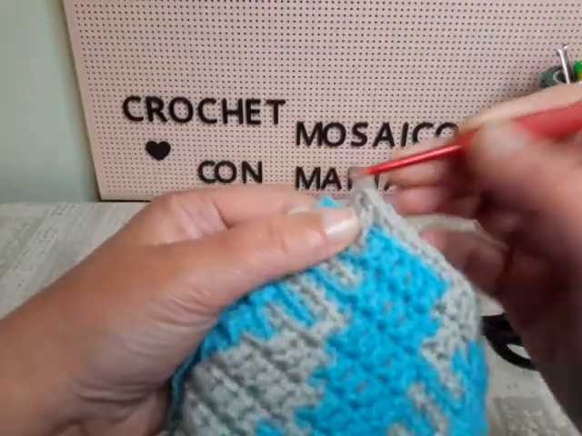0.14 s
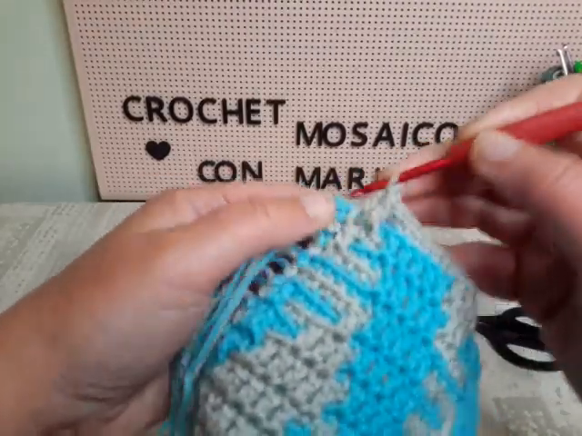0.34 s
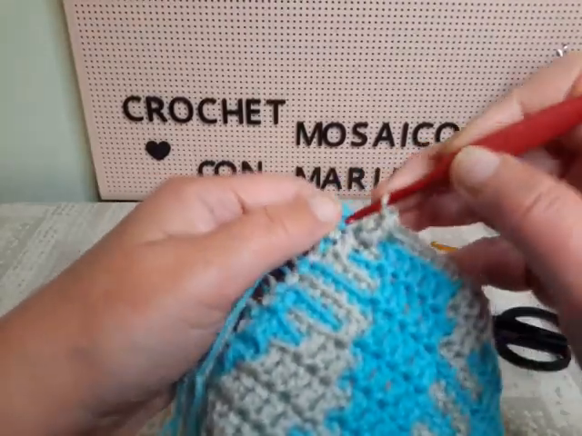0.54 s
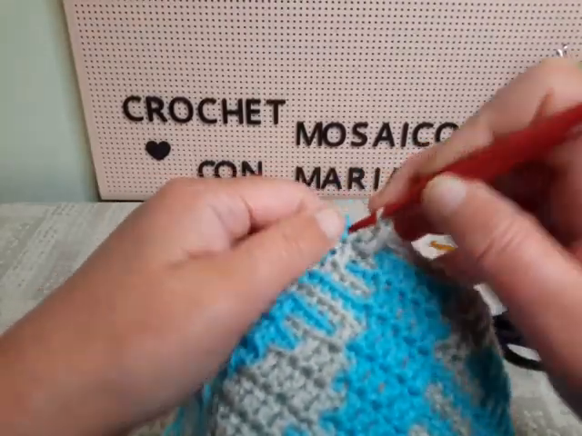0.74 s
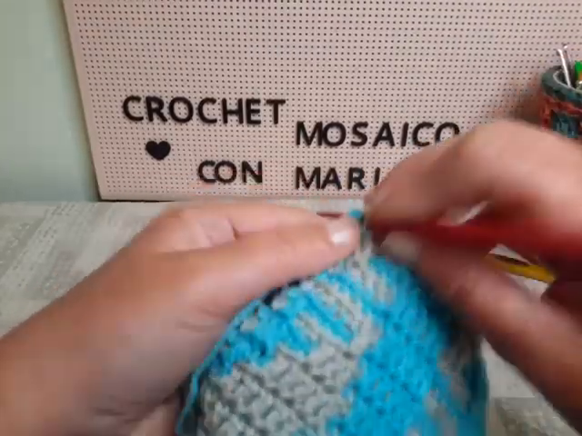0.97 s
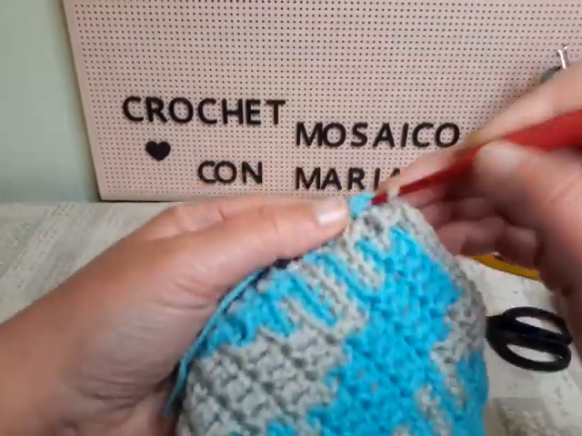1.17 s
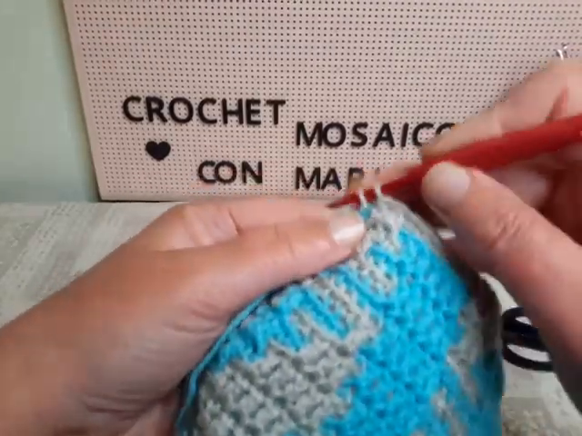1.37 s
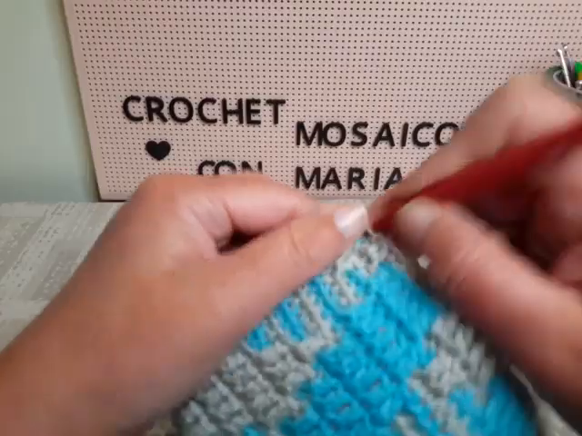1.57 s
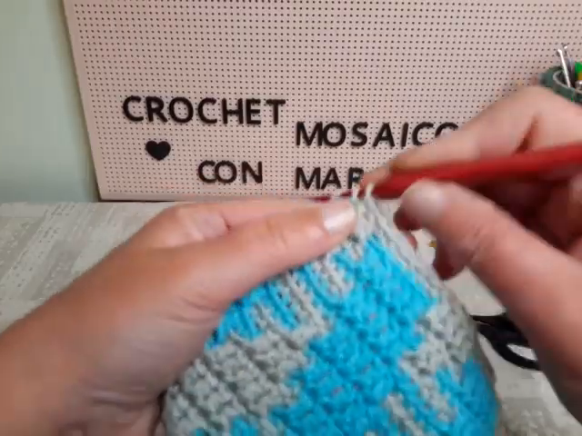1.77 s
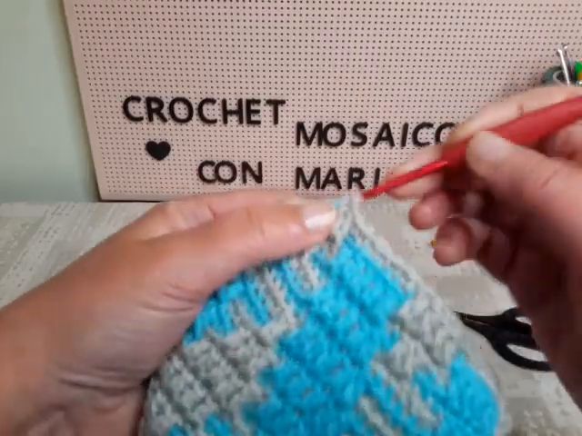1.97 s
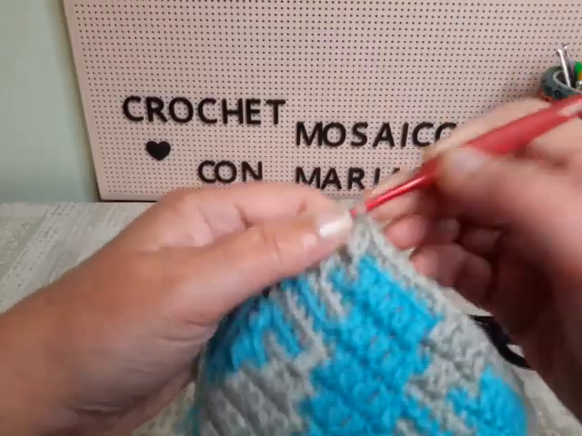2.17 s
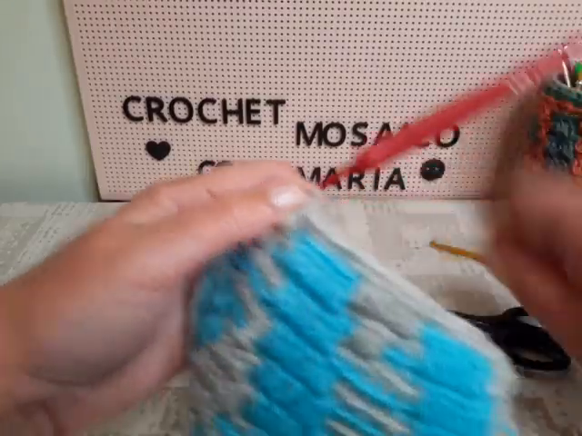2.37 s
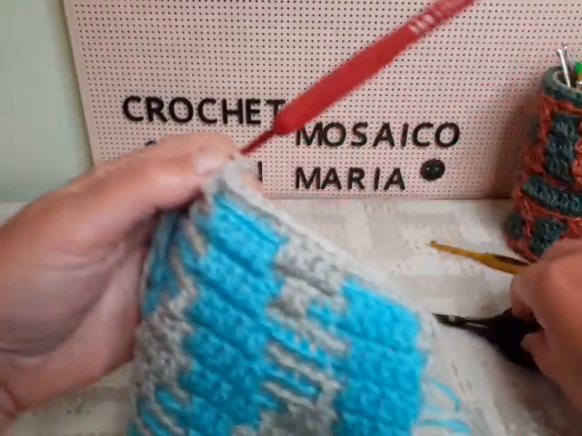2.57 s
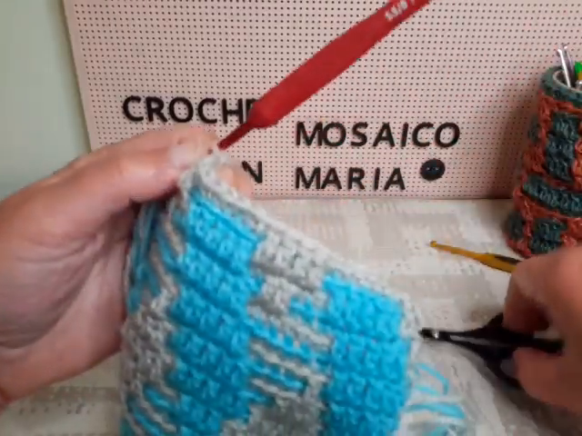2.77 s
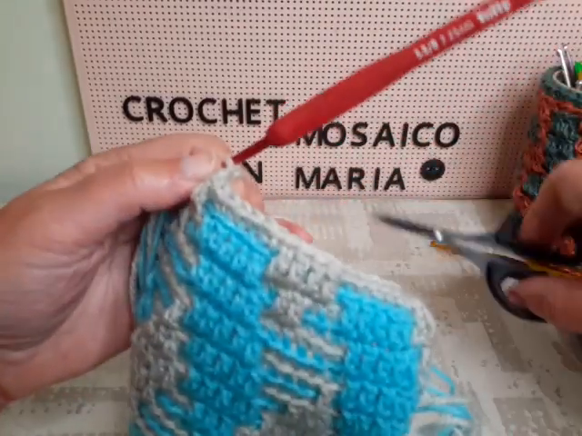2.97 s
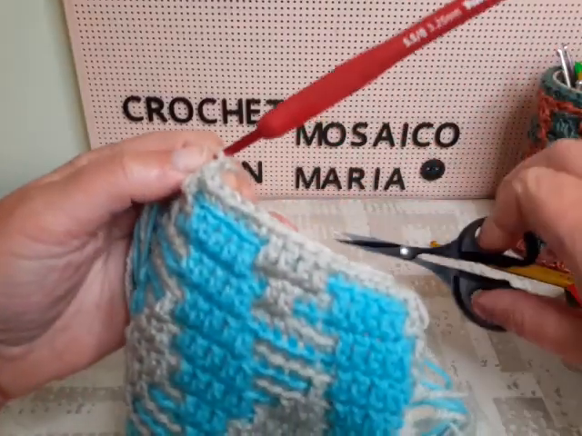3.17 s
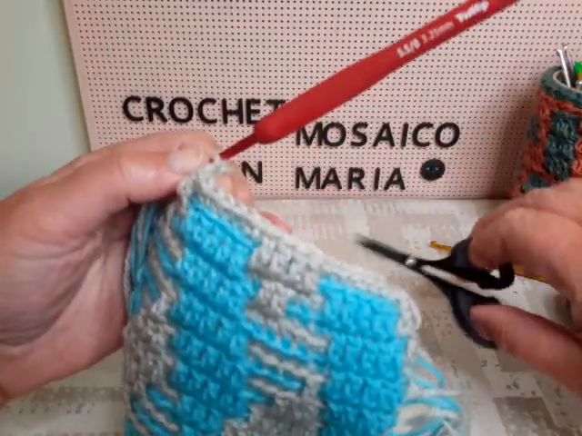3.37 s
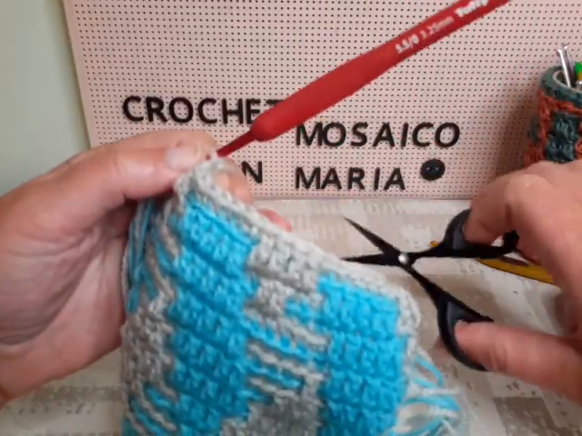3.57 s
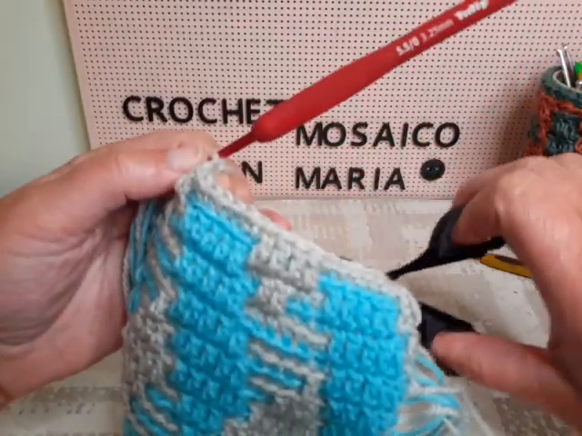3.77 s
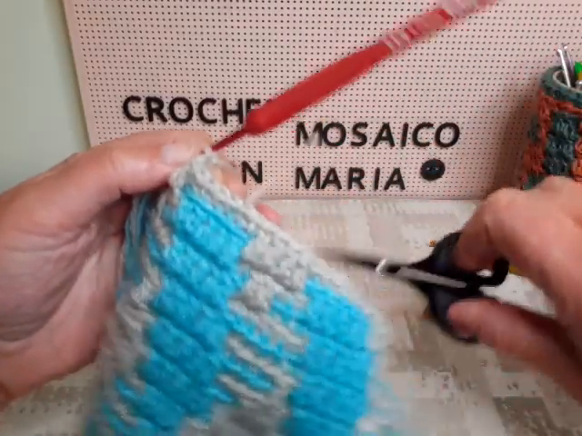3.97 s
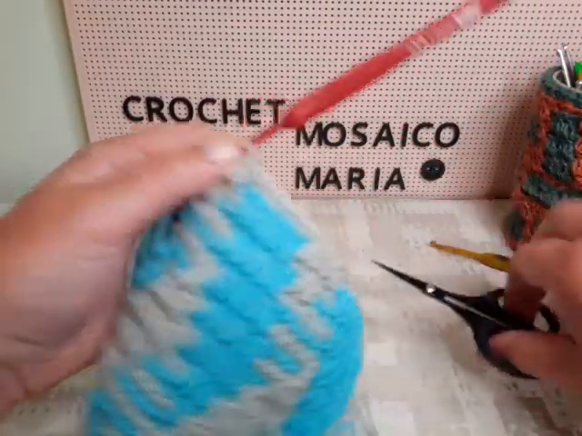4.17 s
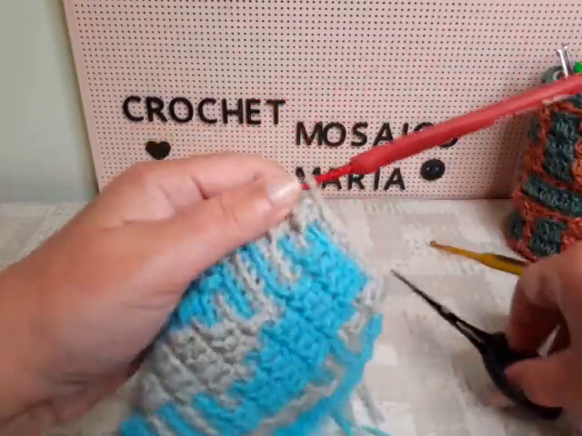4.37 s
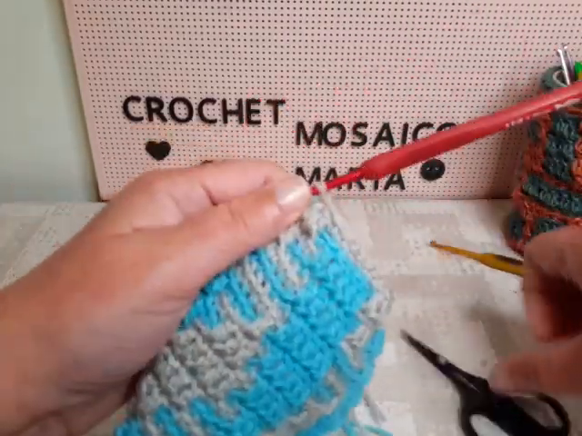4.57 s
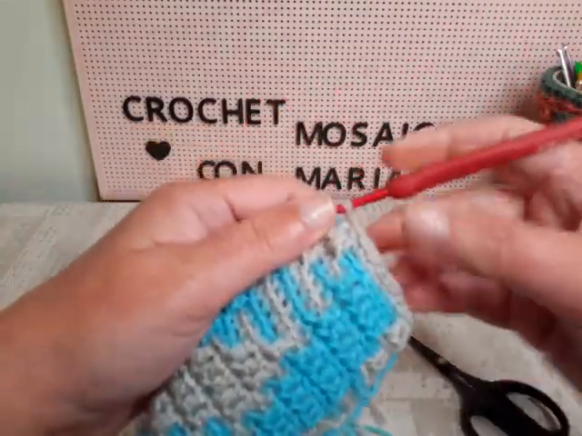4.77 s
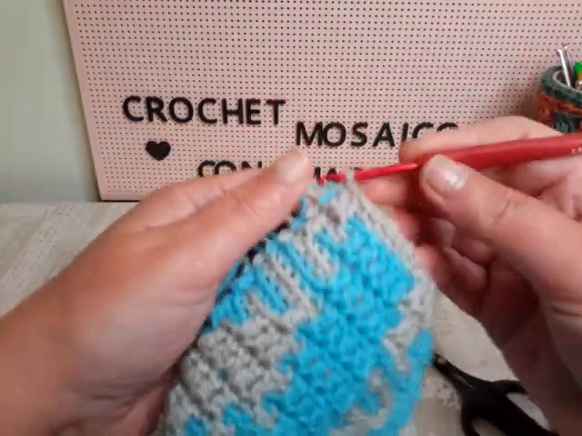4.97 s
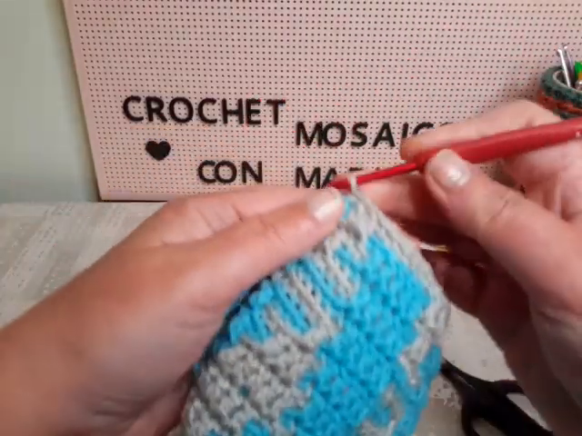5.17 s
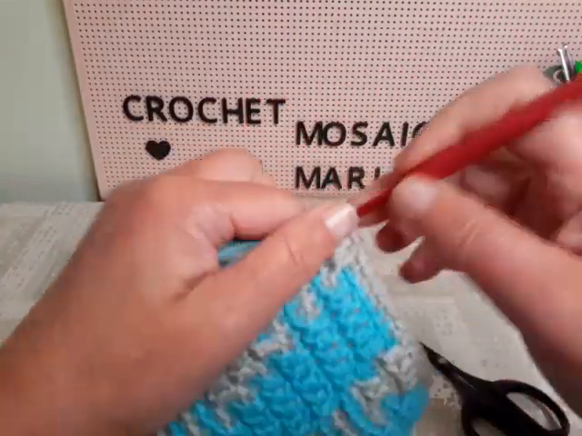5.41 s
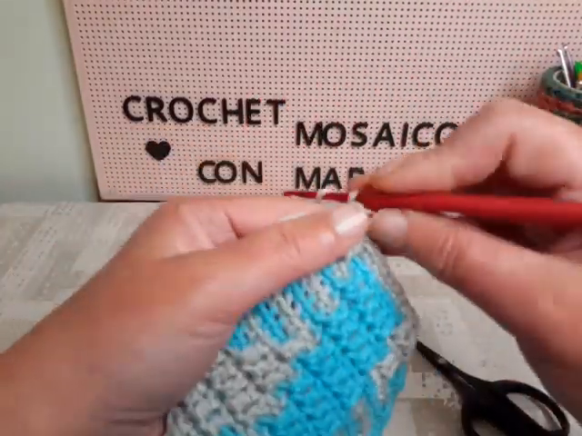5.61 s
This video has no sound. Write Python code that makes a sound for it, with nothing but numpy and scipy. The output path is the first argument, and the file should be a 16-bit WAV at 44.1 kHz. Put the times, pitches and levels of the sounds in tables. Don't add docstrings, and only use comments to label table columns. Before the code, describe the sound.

A small, quiet room with a low, soft hush and very faint hand rustle, heard from close by. From 0 to about 2.1 s hands crochet: yarn sticks and slips on the hook in tiny, short, mid-pitched squeaks, near 0, 0.35, 0.9 to 1.4, 1.6 and 2.1 s, barely above the room. At 2.6 s scissors are picked up: a quick cluster of plastic knocks with a dull wooden thud, then a light scrape and small bumps over cloth until 2.9 s. A barely audible tap follows at 3.0 s. Near 4.05 s the blades shear one strand with a brief crisp rasp, clicking shut at 4.08 s. At 4.7 s the scissors drop back, the loudest event: a dense hard clatter of plastic, steel ticks and hollow table boom, rocking rapidly and settling by about 4.85 s with a short diffuse tail. Soft rustle swells slightly around 5.1 s, then hush.

```python
import sys
import numpy as np
from scipy import signal
from scipy.io import wavfile

SR = 44100
rng = np.random.default_rng(int(sys.argv[2]) if len(sys.argv) > 2 else 0)


def to_wav(sig):
    pcm = np.clip(np.atleast_2d(sig), -1, 1) * 32767
    pcm = np.round(pcm).astype(np.int16)
    wavfile.write(sys.argv[1], SR, pcm.T)


def attenuation_scalar(level_db):
    decades = np.asarray(level_db, float) / 20
    return 10 ** decades


N = 248749

# (frequency [Hz], level [dB per Hz])
AIR_SPECTRUM = [(20, -37), (32, -14), (130, -1.5), (354, -6), (887, -14), (3340, -26), (6560, -34.5),
                (16000, -36)]
AIR_DB = -66
# (time [s], rustle [dB])
HAND_RUSTLE = [(0, 2), (.75, 1.5), (1.3, 5), (2.45, 2.5), (2.6, 7), (3.1, 4.5), (3.6, .5), (4.9, 3),
               (5.1, 7), (5.349, 2)]
# (frequency [Hz], level [dB]; the played rms is 7 dB above this value)
WHINE_TONES = [(10864, -104)]
# (frequency [Hz], t60 [s])
ROOM_DECAY = [(100, 0.27), (500, 0.54), (2000, 0.37), (5000, 0.33), (12000, 0.31)]
# (frequency [Hz], level [dB])
ROOM_TINT = [(100, 1), (300, -0.5), (600, -7), (1200, -4.5), (2200, 2), (5000, 3.5), (12000, 7.5)]
ROOM_DB, ROOM_BUILD_S = -6, 0.0064
EDGES_HZ = 25 * 2 ** np.arange(0, 9.5, .4)

# (peak time [s], rub level [dB], build-up [s], favoured pitch [Hz])
YARN_STROKES = [(.008, -67, 0.04, 1400), (.338, -62.5, 0.037, 1200), (.86, -75, 0.31, 1190),
                (.93, -72, 0.066, 1300), (1.0, -66.5, 0.15, 890), (1.082, -65.5, 0.078, 950),
                (1.16, -72, 0.11, 1200), (1.32, -65.5, .04, 1700), (1.361, -62, 0.036, 1190),
                (1.614, -72, .1, 2000), (2.09, -61, 0.041, 1400)]
# (frequency [Hz], width [Hz], level [dB])
FIBRE_MODES = [(833, 25, -8), (986, 12, -7), (1150, 70, -13.5), (1373, 34, -8.5), (2350, 19, -8.5),
               (3200, 76, -15), (4400, 34, -55)]
YARN_RELEASE_S, FOCUS_DB_PER_OCTAVE = 0.042, 8
STROKE_DEPTH_DB = 20

BOOM_HZ, BOOM_T60_S = 118, .25
TWIN_HZ = 527, 547
# (frequency [Hz], level [dB], t60 [s])
TABLE_MODES = [(BOOM_HZ, -17, BOOM_T60_S), (215.6, -13, 0.19), (267, -10.5, 0.18), (260, -11.5, 0.046),
               (378, -6, 0.094), (413, -13, .06), (468, -9.5, 0.061), (TWIN_HZ[0], 2.7, 0.12), (TWIN_HZ[1],
               2.4, 0.13), (620, -14.5, 0.042), (676, -11, 0.16), (799, -4.5, 0.12), (880, -8, .05)]
# (frequency [Hz], level [dB], t60 [s])
HANDLE_MODES = [(897, -2.5, 0.01), (1180, -7, 0.0094), (1448, -3, 0.02), (1920, -5.5, 0.0064),
                (1930, -5, 0.012), (2470, 3.5, 0.0029), (2940, -8.5, 0.0096), (3430, -8.5, 0.007)]
# (frequency [Hz], level [dB], t60 [s])
BLADE_MODES = [(3530, -6.5, 0.0071), (4230, 2.5, 0.0036), (4416, 2, 0.0056), (4890, 3.5, .004),
               (5300, -2, 0.0062), (6760, 1, 0.0047), (7700, -6, 0.009), (9400, -10.5, 0.0024),
               (11600, -12.5, .003), (13000, -18, .003), (14900, -13, .003)]

# (peak time [s], level [dB], build-up [s])
SHEAR_STROKES = [(4.052, -56, 0.028)]
SHEAR_RELEASE_S = 0.053
# (time [s], click [dB], thump [dB])
SHUT_TAPS = [
    (3.0072, -80, -47),
    (4.057, -69, -51),
    (4.0819, -42, -42.5),
]
# (time [s], level [dB])
BLADE_REBOUND = [(4.0910, -55)]

# (time [s], pressure as level [dB])
DRAG_PRESSURE = [(2.66, -43.5), (2.69, -52.5), (2.72, -59.5), (2.775, -49.5), (2.845, -53.5), (2.86, -48.5),
                 (2.885, -48.5), (2.9, -66), (2.94, -71)]
# (time [s], handle knock [dB], table thud [dB], blade tick [dB])
TABLE_TOUCHES = [(2.6155, -33.5, -43, -57), (2.619, -34, -42, -52), (2.640, -52, -43.5, -64),
                 (2.6451, -30.5, -35, -48), (2.656, -33, -34, -56), (2.773, -42, -40.5, -65),
                 (2.803, -54, -40, -74), (2.855, -48, -42.5, -66), (2.875, -49, -42.5, -64),
                 (4.6904, -28.5, -28.5, -41), (4.6943, -21, -29, -30.5), (4.6975, -23, -32, -40.5),
                 (4.704, -29, -23, -41), (4.719, -20, -21.5, -20.5), (4.7219, -22, -30.5, -31.5)]
# (time [s], knock [dB], thud [dB], gap [s])
ROCK_RUNS = [
    (4.730, -21.5, -24, .0075),
    (4.771, -30, -23, .013),
]
ROCK_SLOWING = 1.15
KNOCK_LOSS_DB_PER_S, THUD_LOSS_DB_PER_S = 399, 281.5
ROCK_TICK_DB, TICK_LOSS_DB_PER_S = -13.5, 203
# (time [s], level [dB])
HAND_LEANS = [(2.647, -39), (2.778, -52), (2.86, -53), (4.734, -40.5)]
LEAN_S = 0.0044

LOW_CUT_HZ, TOP_HZ = 95, 15780
SHADE_HZ, SHADE_DB = 5960, -10.5


def rms_one(x):
    return x / np.sqrt(np.mean(x ** 2) + 1e-20)


def at_hz(points, hz):
    points_hz, points_db = np.transpose(points)
    return np.interp(np.log(hz), np.log(points_hz), points_db)


def band(x, low, high):
    sos = signal.butter(2, [low, min(high, .45 * SR)], "band", fs=SR, output="sos")
    return signal.sosfilt(sos, x)


def dull(x, hz):
    return signal.sosfilt(signal.butter(4, hz, fs=SR, output="sos"), x)


def envelope(*spans):
    t = np.arange(N) / SR
    return sum(attenuation_scalar(np.interp(t, *np.transpose(rows), left=-200, right=-200)) for rows in spans)


def strokes(rows, release_s):
    deep = 3 * STROKE_DEPTH_DB
    return envelope(*[[(s - 3 * rise_s, db - deep), (s, db), (s + 3 * release_s, db - deep)]
                      for s, db, rise_s in rows])


def ring(clicks, hz, t60):
    r = attenuation_scalar(-60 / (t60 * SR))
    w = 2 * np.pi * hz / SR
    return signal.lfilter([0, np.sin(w)], [1, -2 * r * np.cos(w), r * r], clicks + 1e-18)


def ring_body(clicks, modes, stretch=1):
    return rms_one(sum(attenuation_scalar(db) * ring(clicks, hz, stretch * t60) for hz, db, t60 in modes))


def grains(per_s, spread_db):
    sizes = attenuation_scalar(spread_db * np.minimum(rng.exponential(1, N), 4)) * rng.choice([-1, 1], N)
    return rms_one(sizes * (rng.random(N) < per_s / SR))


def strike(times, levels_db, modes, chatter_s, spread_db, push=False):
    out, steps = np.zeros(N), np.arange(8)
    draws = rng.standard_normal((len(times), len(modes), 9))
    late = (steps + rng.random((len(times), 8)) * (steps > 0)) * chatter_s / 8
    at = ((np.array(times)[:, None] + late) * SR).astype(int)
    for k, (hz, mode_db, t60) in enumerate(modes):
        clicks = np.zeros(N)
        share_db = mode_db + spread_db * draws[:, k, :1]
        size = attenuation_scalar(np.array(levels_db)[:, None] + share_db - 1.5 * steps)
        sign = np.sign(draws[:, k, 1:2 if push else 9])
        np.add.at(clicks, at, size * sign)
        out += ring(clicks, hz, t60)
    return out


def air():
    white, out = rng.standard_normal((2, N)), 0
    t = np.arange(N) / SR
    rustle_db = np.interp(t, *np.transpose(HAND_RUSTLE))
    for k, (low, high) in enumerate(zip(EDGES_HZ, EDGES_HZ[1:])):
        hz = np.sqrt(low * high)
        share = at_hz([(300, 0.2), (1500, 0.45), (5000, 1.0), (8000, 0.05)], hz)
        out = out + attenuation_scalar(at_hz(AIR_SPECTRUM, hz) + share * rustle_db) * band(white[k % 2], low, high)
    whine = sum(attenuation_scalar(db + 7.0) * np.sqrt(2) * np.sin(2 * np.pi * hz * t) for hz, db in WHINE_TONES)
    return attenuation_scalar(AIR_DB) * rms_one(out) + whine


def room(x):
    t = np.arange(SR // 2) / SR
    white, tail = rng.standard_normal((2, len(t))), 0
    for k, (low, high) in enumerate(zip(EDGES_HZ, EDGES_HZ[1:])):
        hz = np.sqrt(low * high)
        decay = attenuation_scalar(at_hz(ROOM_TINT, hz) - 60 * t / at_hz(ROOM_DECAY, hz))
        tail = tail + band(white[k % 2], low, high) * decay
    tail = tail * np.clip(t / ROOM_BUILD_S, 0, 1) ** 2
    return signal.fftconvolve(x, tail / np.sqrt(np.sum(tail ** 2)))[:N]


def yarn():
    slips = grains(3000, spread_db=-3.5)
    rings = [attenuation_scalar(db) * rms_one(ring(slips, hz, 1 / width)) * np.sqrt(width)
             for hz, width, db in FIBRE_MODES]
    whole = np.std(sum(rings))
    body = 0
    for one, (hz, _, _) in zip(rings, FIBRE_MODES):
        focused = [(s, db + 3 - FOCUS_DB_PER_OCTAVE * abs(np.log2(hz / focus_hz)), rise_s)
                   for s, db, rise_s, focus_hz in YARN_STROKES]
        body = body + one / whole * strokes(focused, YARN_RELEASE_S)
    wide = rms_one(band(slips, 2200, 5600))
    return body + attenuation_scalar(-9.5) * wide * strokes([row[:3] for row in YARN_STROKES], YARN_RELEASE_S)


def shear():
    fibres = grains(9000, spread_db=2.0)
    edge = ring_body(fibres, BLADE_MODES, 1.4)
    hiss = rms_one(band(band(fibres, 14000, 16500), 14000, 16500))
    grip = ring_body(fibres, HANDLE_MODES)
    cut = edge + attenuation_scalar(-14) * grip + attenuation_scalar(-11) * hiss
    return strokes(SHEAR_STROKES, SHEAR_RELEASE_S) * cut


def snap_shut():
    s, click_db, thump_db = np.transpose(SHUT_TAPS)
    click = strike(s, click_db - 6, BLADE_MODES + HANDLE_MODES[3:], chatter_s=.003, spread_db=1)
    thump_modes = [(128, -11, 0.034), (250, 2.5, 0.0081), (435, -5, 0.0068),
                   (840, -4, 0.0071), (1570, -12, 0.016)]
    thump = strike(s, thump_db - 14.5, thump_modes, chatter_s=.0002, spread_db=1, push=True)
    rebound = strike(*np.transpose(BLADE_REBOUND), [(4400, 0, .004)],
                     chatter_s=.00005, spread_db=1, push=True)
    return click + thump + rebound


def drag():
    slips = grains(4000, spread_db=2.0)
    table = attenuation_scalar(-5.5) * band(ring_body(slips, TABLE_MODES, 0.4), 410, 3100)
    handle = attenuation_scalar(-3.0) * dull(ring_body(slips, HANDLE_MODES, 0.4), 2400)
    blade = attenuation_scalar(-14) * ring_body(slips, BLADE_MODES, 0.4)
    return envelope(DRAG_PRESSURE) * (table + handle + blade)


def rocking():
    rows = []
    for s, knock_db, thud_db, gap_s in ROCK_RUNS:
        for after in gap_s * np.arange(4) ** ROCK_SLOWING:
            tick_loss = (KNOCK_LOSS_DB_PER_S + TICK_LOSS_DB_PER_S) * after
            rows.append((s + after,
                         knock_db - KNOCK_LOSS_DB_PER_S * after,
                         thud_db - THUD_LOSS_DB_PER_S * after,
                         knock_db + ROCK_TICK_DB - tick_loss))
    return rows


def touches():
    s, knock_db, thud_db, tick_db = np.transpose(TABLE_TOUCHES + rocking())
    thud = strike(s, thud_db - 21, TABLE_MODES[1:], chatter_s=.0003, spread_db=2, push=True)
    knock = strike(s, knock_db - 6.5, HANDLE_MODES, chatter_s=.004, spread_db=2)
    tick = strike(s, tick_db, BLADE_MODES, chatter_s=.0036, spread_db=2)
    boom = strike(*np.transpose(HAND_LEANS), TABLE_MODES[:1], LEAN_S, spread_db=2, push=True)
    thud = band(dull(thud, 1750), 110, 5996)
    return thud + band(knock, 580, 5200) + band(tick, 1800, 18000) + dull(boom, 200)


def scene():
    near = yarn() + shear() + snap_shut() + drag() + touches()
    near = signal.sosfilt(signal.butter(4, LOW_CUT_HZ, "high", fs=SR, output="sos"), near)
    near = dull(near, SHADE_HZ) + attenuation_scalar(SHADE_DB) * near
    return (near + attenuation_scalar(ROOM_DB) * room(near) + air())[None]


def low_pass(x):
    return signal.sosfilt(signal.butter(12, 16500, fs=SR, output="sos"), x)


def record(dry):
    cut = signal.sosfilt(signal.ellip(10, .5, 45, TOP_HZ, fs=SR, output="sos"), dry)
    mix = cut - .0005
    return low_pass(mix)


dry = scene()
out = record(dry)
to_wav(out)
```